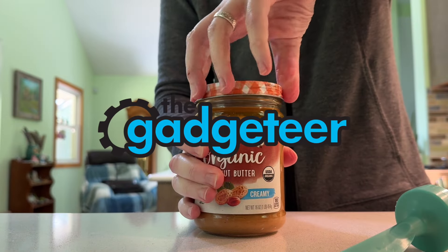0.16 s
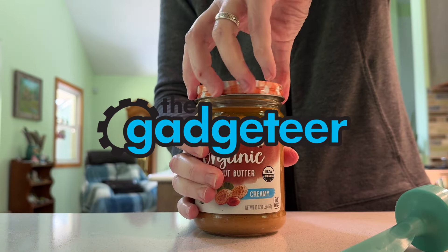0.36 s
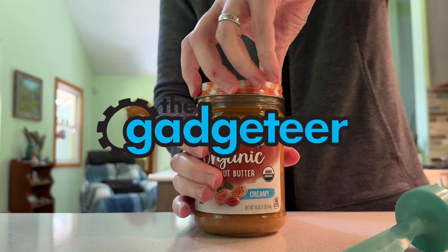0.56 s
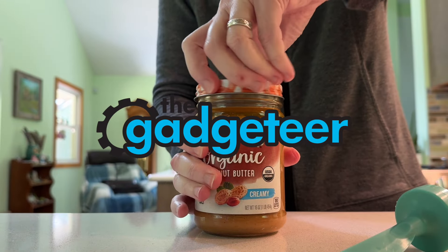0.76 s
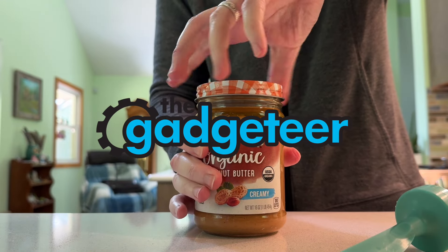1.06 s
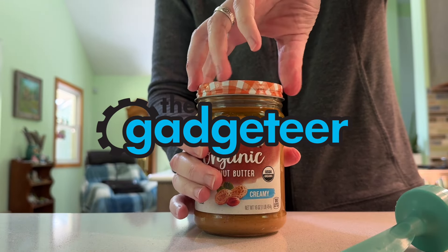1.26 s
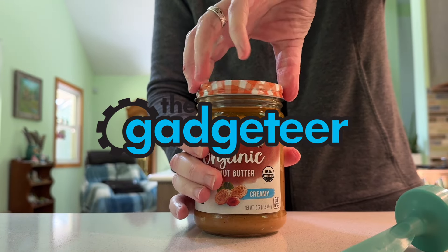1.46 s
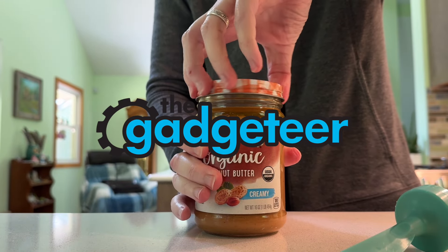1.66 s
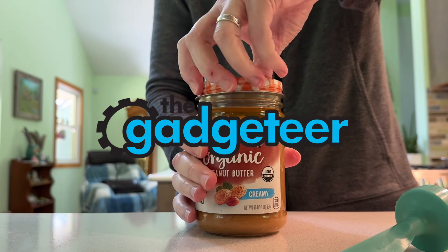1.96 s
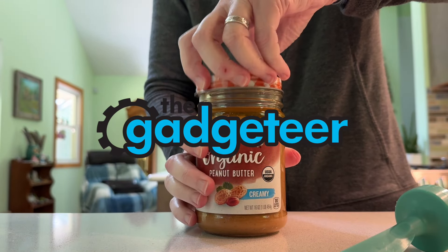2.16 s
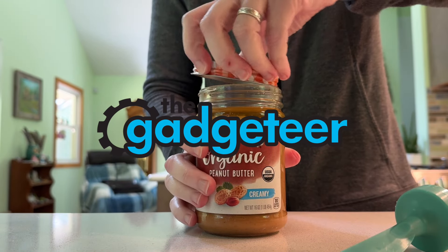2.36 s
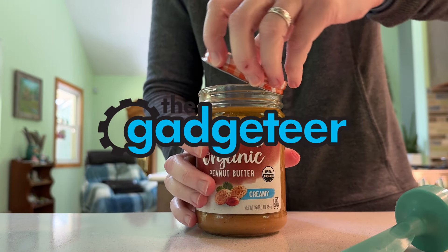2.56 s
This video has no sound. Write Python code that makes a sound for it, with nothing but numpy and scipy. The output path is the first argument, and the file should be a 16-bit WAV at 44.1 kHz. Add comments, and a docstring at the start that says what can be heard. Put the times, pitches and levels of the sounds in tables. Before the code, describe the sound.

Close hollow clunks and gritty scrapes as a thin metal lid unscrews from a filled glass jar

```python
"""In a quiet living room, close to a phone, a hand twists a metal lid off a full glass jar.
The lid knocks on the glass and scrapes along the threads in several stretches. Knocks are bursts of noise
and scrapes are streams of tiny clicks; both ring the same fading tones (modes) of lid and jar.
A short room tail, dull thumps, faint low tones, a rumble and a hiss lie behind."""
import sys
import numpy as np
from scipy import signal
from scipy.fft import rfft, irfft
from scipy.io import wavfile
from scipy.ndimage import uniform_filter1d, map_coordinates

SR = 44100
rng = np.random.default_rng(int(sys.argv[2]) if len(sys.argv) > 2 else 0)


def undo_db(level):
    """Turn decibels back into plain size, where 20 dB means ten times bigger."""
    steps = np.asarray(level, float) / 20
    return 10 ** steps


def store_wav(level_fs):
    """Save 16-bit WAV to argv[1]."""
    pcm = np.round(np.clip(np.atleast_2d(level_fs), -1, 1) * 32767)
    wavfile.write(sys.argv[1], SR, pcm.T.astype(np.int16))


N = 119070  # length in samples

# Hiss of the room. Each row: frequency in Hz, relative level in dB.
AIR_COLOUR = [(25, -50), (55, -22), (250, 3), (350, 9.5), (800, 6.5), (1900, -5.5), (2700, -17.5),
              (8000, -25), (11000, -34.5), (16000, -11)]
# Brief low tones. Each row: start in seconds, length in seconds, frequency in Hz,
# level in dB rms at the top of the swell, before the left/right balance.
LOW_TONES = [(.83, .18, 240, -57), (1.3, .2, 245, -64), (2.42, .1, 240, -62), (.0, .4, 185, -64)]
# Strength of the low rumble. Each row: time in seconds, level in dB before its random wander.
RUMBLE_LEVEL = [(0, -58.5), (.3, -65), (.88, -61.5), (.96, -62), (1.599, -68), (2.7, -74)]
# Dull thumps through the table top. Each row: time in seconds, relative level in dB.
TABLE_THUMPS = [(0.127, -46), (0.37, -47), (0.837, -57.5)]
# Knocks of lid on glass. Each row: start in seconds, level of the low modes in relative dB,
# then middle modes, upper modes and crack in dB over the low ones,
# fading time of the chatter in ms, favoured upper mode in Hz.
LID_KNOCKS = [(0.132, -21, -14, -17.5, -23, 3, 1950), (0.136, -24, -16, -4.5, -14, 9.2, 1854),
              (0.255, -33.5, -30, -9, -23.5, 1.2, 1854), (0.377, -13, -17.5, -8.5, -31, 1.6, 1956),
              (0.409, -27, -27, -46, -38, 0.33, 1900), (0.583, -31.5, -19, -22, -18.5, 2.8, 1900),
              (0.609, -34.5, -7, -12, -45, 1.7, 1900), (0.658, -22, -15, -45, -40.5, 5.5, 1900),
              (0.749, -28.5, -6, -4.5, -19, 4.5, 1910), (0.834, -27.5, -8, 10.5, -17.5, 3, 1958),
              (0.905, -18, -20.5, -3.5, -12.5, 2.7, 1900), (1.26, -24.5, -14, -5.5, -19, 0.71, 1900),
              (1.315, -24, -16, -13, -20.5, 1.4, 1900), (1.366, -38, -14, -8, -22, 3, 1900),
              (1.52, -17.5, -14, 0.5, -17.5, 0.73, 1952), (1.611, -24.5, -44, -28, -46, 2.8, 1900),
              (1.788, -21.5, -14.5, -16, -16, 0.61, 1960), (1.839, -24.5, -11.5, -30, -31.5, 2, 1900),
              (1.891, -34, -21, -6.5, -16, 2.5, 1842), (2.191, -29.5, -35.5, -14, -27, 3.7, 1810),
              (2.235, -41.5, 10, 6.5, 1, 3.6, 1852), (2.392, -32.5, 9.5, 18, -14, 0.88, 1852),
              (2.609, -63.5, 7, 21.5, 1.5, 3, 1713)]
# Modes of lid and jar. Each row: frequency in Hz, relative level in dB,
# time to fall by 60 dB in seconds before any damping.
LID_MODES = [(444, -3.5, 0.078), (528.5, -2, 0.074), (620, -8.5, 0.073), (705, 1, 0.063),
             (757.5, 1.5, 0.063), (827.8, 1, 0.079), (882, -5, 0.023), (1041, -5.5, 0.067),
             (1184, 6.5, 0.039), (1305, -7.5, 0.13), (1520, 2, 0.064), (1773, 8.5, 0.03),
             (1852, 3.5, 0.062), (1900, 4, 0.059), (1935.6, 5, 0.022), (2324, 0.5, 0.031)]
# Treble modes of the lid's rim. Each row: frequency in Hz, relative level in dB, time to fall by 60 dB in seconds.
RIM_MODES = [(2760, -25, 0.047), (3245, -13, 0.075), (4052, -11, 0.07), (4060, -21, 0.012),
             (5697, -3.5, 0.0072)]
# Colour of the crack and of the scraping hiss. Each row: frequency in Hz, relative level in dB.
CRACK_COLOUR = [(1500, -69.5), (2500, 1.5), (4400, -6), (6000, -5), (8800, -5.5), (11500, 4), (14500, -4),
                (16000, 0.5)]
# How well the lid sends out sound; a small lid gives little bass. Each row: frequency in Hz, gain in dB.
RADIATION_GAIN = [(150, -23), (300, -29.5), (390, -2.5), (2050, -6.5), (2250, -8), (4000, 13)]
# Pressure of the scrape on the threads, one list a stretch. Each row: time in seconds, relative level in dB.
SCRAPE_PRESSURE = [
    [(0.17, -64), (0.234, -52), (0.26, -52.5), (0.362, -35.5), (0.374, -48)],
    [(0.39, -38), (0.424, -41), (0.604, -35), (0.625, -27), (0.642, -44), (0.662, -40.5), (0.682, -31.5),
     (0.76, -32.5), (0.826, -51), (0.85, -38), (0.9, -54.5)],
    [(1.47, -86), (1.478, -45.5), (1.51, -43.5)],
    [(1.55, -45), (1.604, -35.5), (1.625, -41), (1.644, -36), (1.658, -44), (1.702, -36.5), (1.718, -40.5),
     (1.732, -39), (1.762, -33.5), (1.794, -34.5), (1.816, -47.5), (1.854, -31), (1.93, -51), (1.98, -53.5)],
    [(2.04, -55), (2.054, -45), (2.134, -37), (2.16, -51.5), (2.2, -42), (2.222, -63.5), (2.236, -32)],
    [(2.41, -57), (2.432, -67.5), (2.47, -53.5), (2.526, -65.5), (2.6, -77)],
]
# Where the contact sits. Each row: time in seconds, favoured low mode in Hz,
# then upper modes, hiss and rim as relative levels in dB.
CONTACT_PLACE = [(0.139, 836, -41, -24, 5), (0.304, 823, -2, -15.5, -29), (0.382, 620, -22, -24.5, -27),
                 (.5, 620, -30.5, -38.5, -49), (0.619, 618, -24.5, -38.5, -42),
                 (0.762, 675, -19.5, -28, -35), (0.859, 798, -1, -19, -16), (1.26, 824, -28, -49, -28),
                 (1.32, 717, -29, -44, -44), (1.58, 825, -17.5, -25, -24.5), (1.7, 840, -8.5, -20, -33),
                 (1.745, 805, -7.5, -23, -36), (1.8, 803, -17, -37, -37), (1.9, 622, -25.5, -27, -30),
                 (2.058, 620, -45, -55, -76), (2.14, 720, -16.5, -27.5, -42.5), (2.2, 860, -9.5, -18, -7.5),
                 (2.271, 910, -19, -12, 7), (2.418, 830, -5.5, -9, 9.5), (2.481, 890, 3.5, -6.5, 5),
                 (2.581, 880, 5, -41, -0.5)]
# Broad sound of the rim. Each row: frequency in Hz, relative level in dB.
RUSTLE_COLOUR = [(1500, -29.5), (2300, -2), (4000, -5.5), (5500, -6), (8500, -22.5), (12000, -51)]
# Timing between the microphone ports. Each row: frequency in Hz, phase in radians by which the left leads.
PORT_LEAD = [(0, 0), (1640, .7), (3960, 1), (4570, .6), (5340, -6.3), (6720, -6.6), (7670, -12.9),
             (8610, -12.8), (9040, -15.2), (16000, -28.4)]
# Colour between the ports. Each row: frequency in Hz, left minus right in dB.
PORT_BALANCE = [(200, -3.5), (1300, -1.5), (2400, -3.5), (4400, 7), (8000, 0.5)]
# Treble colour of the whole sound, with a narrow gap. Each row: frequency in Hz, gain in dB.
TREBLE_COLOUR = [(8800, 0), (9400, -1), (9900, 1), (12300, 6.5), (12700, -48), (13100, 8), (14700, 4),
                 (15400, -12.5), (16400, -33)]


def level(x, db):
    """Scale to an rms level in dB."""
    return x * undo_db(db) / np.sqrt(np.mean(x ** 2))


def shape(x, table, phase=0):
    """Colour a sound by (Hz, dB) points, with an optional phase turn at each frequency."""
    hz, table = np.fft.rfftfreq(N, 1 / SR), np.array(table, float)
    db = np.interp(np.log(hz + 1), np.log(table[:, 0]), table[:, 1])
    return irfft(rfft(x) * undo_db(db) * np.exp(1j * phase), N)


def walk(rate):
    """Random levels, rate of them a second, joined smoothly; their spread is near 1."""
    hold = int(SR / rate)
    steps = np.repeat(rng.standard_normal(N // hold + 1), hold)
    return 1.4 * uniform_filter1d(uniform_filter1d(steps, hold), hold)[:N]


def ring(x, hz, t60, swell_t60=0.014):
    """One fading mode that builds up briefly (times in seconds), so it gives little sound off its pitch."""
    w = 2 * np.pi * hz / SR
    r, q = 1000. ** (-1 / (np.array([t60, swell_t60]) * SR))  # what is left after one sample
    y = signal.lfilter([0, np.sin(w)], [1, -2 * r * np.cos(w), r * r], x)
    return signal.lfilter([0, 2 * (1 - q) * np.sin(w)], [1, -2 * q * np.cos(w), q * q], y)


def favour(hz, s, slope_db):
    """Low modes far from the favoured one answer less, by slope_db an octave and at most 12 dB."""
    rows = np.array(CONTACT_PLACE, float)
    octaves_off = np.abs(np.log2(hz / np.interp(s, rows[:, 0], rows[:, 1])))
    return np.maximum(-slope_db * octaves_off, -12)


def background():
    """Shaped noise makes hiss, rumble and thumps, and swelling sines the low tones; the bass is mostly central."""
    t, side = np.arange(N) / SR, np.array([[1], [-1]])
    mid, wide = rng.standard_normal((2, N))
    wide = shape(shape(wide, AIR_COLOUR), [(60, 2), (2000, 0.5)])
    air = level(shape(mid, AIR_COLOUR) + side * wide, -63.5)

    tones = 0
    for start, length, hz, db in LOW_TONES:
        swell = np.sin(np.pi * np.clip((t - start) / length, 0, 1))
        tones = tones + undo_db(db) * np.sqrt(2) * np.sin(2 * np.pi * hz * t) * swell

    low_mid, low_wide = rng.standard_normal((2, N))
    low = shape(low_mid + 0.34 * side * low_wide,
                [(30, -69), (55, -2), (130, 1), (200, 3), (320, -5.0), (1000, -51.5)])
    rows = np.array(RUMBLE_LEVEL)
    rumble = undo_db(np.interp(t, rows[:, 0], rows[:, 1]) + 2 * walk(9.97))
    thump = sum(undo_db(db - 4.0) * (t > s) * np.exp(-np.abs(t - s) / 0.038) for s, db in TABLE_THUMPS)
    return air + tones + level(low, 0) * (thump + rumble)


def knocks():
    """Each knock drives the modes with a blow and a short chatter of contacts, with a crack of treble noise."""
    span = 2048  # samples that one knock drives
    t = np.arange(span) / SR
    rise_ms, crack_rise_ms, crack_t60_s = 0.5, 1, 0.025
    blow_db = 2  # first blow over the chatter that follows
    modes = LID_MODES + RIM_MODES
    mode_hz = np.array(modes)[:, 0]
    push, crack = np.zeros((len(modes), N + span)), np.zeros(N + span)

    for s, db, middle_db, upper_db, crack_db, chatter_ms, upper_hz in LID_KNOCKS:
        i = int(s * SR)
        chatter_noise, mode_chance, crack_noise = rng.standard_normal((3, span))
        fade = (1 - np.exp(-1000 * t / rise_ms)) * np.exp(-1000 * t / chatter_ms)
        chatter = fade * chatter_noise
        chatter = chatter / np.sqrt(np.sum(chatter ** 2)) + undo_db(blow_db) * (t == 0)

        # upper modes lose 320 dB an octave away from the favoured one, at most 15 dB
        off_db = np.maximum(-320 * np.abs(np.log2(mode_hz / upper_hz)), -15)
        low_db = favour(mode_hz, s, 19)
        for k, (hz, mode_db, _) in enumerate(modes):
            if hz < 1000:
                group_db = low_db[k]
            elif hz < 1500:
                group_db = middle_db
            elif hz < 2600:
                group_db = upper_db + off_db[k]
            else:
                group_db = crack_db - 5.5
            # even out how strongly this chatter happens to drive this pitch
            strength = np.abs(np.sum(chatter * np.exp(-2j * np.pi * hz * t)))
            scatter_db = 2 * mode_chance[k]
            push[k, i:i + span] += undo_db(db + group_db + mode_db + scatter_db) * chatter / (.3 + strength)

        crack_rise = np.clip(1000 * t / crack_rise_ms, 0, 1)
        crack_fade = np.maximum(fade, undo_db(-5) * 1000. ** (-t / crack_t60_s))
        crack[i:i + span] += undo_db(db + crack_db) * crack_noise * crack_rise * crack_fade

    rings = []
    for k, (hz, _, t60) in enumerate(modes):
        # the full jar shortens the low modes after a blow
        damping = .6 if hz < 800 else .8 if hz < 1000 else 1
        rings.append(ring(push[k, :N], hz, t60 * damping, swell_t60=.011))
    lid = shape(sum(rings[:len(LID_MODES)]), RADIATION_GAIN)
    rim = shape(sum(rings[len(LID_MODES):]), CRACK_COLOUR[:2])
    unit = np.std(shape(rng.standard_normal(N), CRACK_COLOUR))
    return undo_db(0.5) * (lid + rim) + undo_db(5) * shape(crack[:N], CRACK_COLOUR) / unit


def room(x):
    """Two unrelated tails of fading noise, left and right, the treble dying sooner."""
    t = np.arange(SR // 2) / SR
    low_t60_s, treble_t60_s, delay_s = 0.47, 0.35, 0.00053
    noise = rng.standard_normal((2, len(t)))
    low = signal.lfilter(*signal.butter(1, 2500, fs=SR), noise)
    tail = low * 1000. ** (-t / low_t60_s) + (noise - low) * 1000. ** (-t / treble_t60_s)
    tail = tail * (t > delay_s)
    tail = tail / np.sqrt(np.sum(tail ** 2, axis=1, keepdims=True))
    return undo_db(-11) * signal.fftconvolve(x[None], tail, axes=1)[:, :N]


def scrape():
    """Dense stick-slip clicks ring the modes, damped by the grip; a hiss and a rustle of the rim follow them."""
    t = np.arange(N) / SR
    slips_per_s, slip_spread_db, patchy_db, drift_db = 4000, 2.5, 1.5, 2.5
    grip_damping, wobble_ms = 0.91, .3
    slips = rng.random(N) < slips_per_s / SR
    slips = slips * undo_db(slip_spread_db * rng.exponential(size=N)) * rng.choice([-1, 1], N)
    pressure = 0
    for stretch in SCRAPE_PRESSURE:
        pressure = pressure + undo_db(np.interp(t, *np.array(stretch).T, left=-200, right=-200))
    drive = level(slips, -18.0) * uniform_filter1d(pressure, size=200) * undo_db(patchy_db * walk(59.81))

    rows = np.array(CONTACT_PLACE, float)
    upper_db, hiss_db, rim_db = (np.interp(t, rows[:, 0], col) for col in rows.T[2:])
    lid = 0
    for hz, mode_db, t60 in LID_MODES:
        if hz < 1000:
            group_db = favour(hz, t, 50)
        else:
            group_db = upper_db - (2 if 1800 < hz < 2000 else 6)
        push = drive * undo_db(mode_db + group_db + drift_db * walk(18))
        lid = lid + ring(push, hz, t60 * grip_damping)
    # the shifting grip bends all these modes a little
    lid = map_coordinates(lid, [(t + wobble_ms / 1000 * walk(9)) * SR], order=1, mode="nearest")

    hiss = shape(drive * undo_db(hiss_db), CRACK_COLOUR) * undo_db(14.5)
    rim = sum(ring(drive * undo_db(mode_db + rim_db), hz, t60) for hz, mode_db, t60 in RIM_MODES)
    rim = shape(rim + drive * undo_db(rim_db + 15), RUSTLE_COLOUR)
    return shape(lid, RADIATION_GAIN) + hiss + rim


def scene():
    """The lid reaches two microphone ports with a lag and a colour between them; room and background join."""
    lid = knocks() + scrape()
    half_lead = np.interp(np.fft.rfftfreq(N, 1 / SR), *np.array(PORT_LEAD).T) / 2
    near = []
    for sign in (1, -1):  # left, then right
        half_balance = [(hz, sign * db / 2) for hz, db in PORT_BALANCE]
        near.append(shape(lid, half_balance, sign * half_lead))
    # the background is 1 dB softer on the left and 1 dB louder on the right
    return np.array(near) + room(lid) + background() * undo_db(np.array([[-1.], [1.]]))


def low_pass(x):
    """Removes everything above the highest recorded frequency."""
    return signal.sosfilt(signal.butter(12, 16440, fs=SR, output="sos"), x)


def record(dry):
    """The whole sound gets a treble colour with a narrow gap, and a steep filter cuts the top above 16300 Hz."""
    top_cut = signal.ellip(8, .2, 70, 16300, fs=SR, output="sos")
    mix = signal.sosfilt(top_cut, shape(dry, TREBLE_COLOUR))
    return low_pass(mix)


dry = scene()
out = record(dry)
store_wav(out)
```